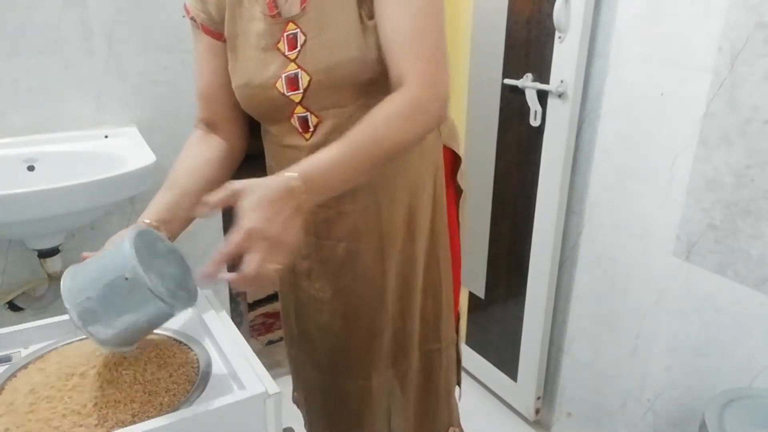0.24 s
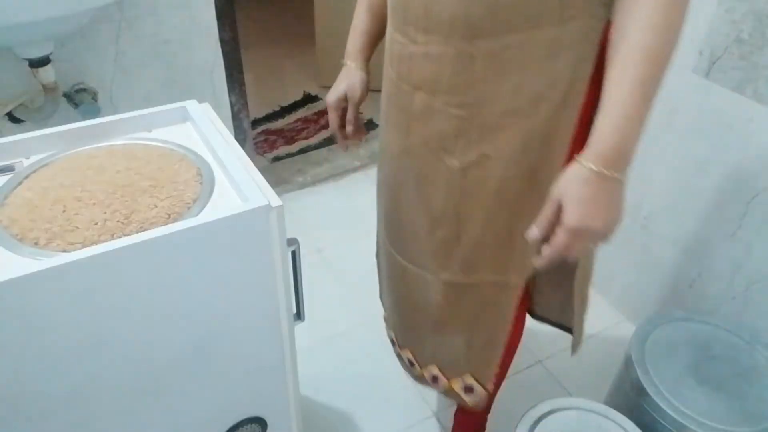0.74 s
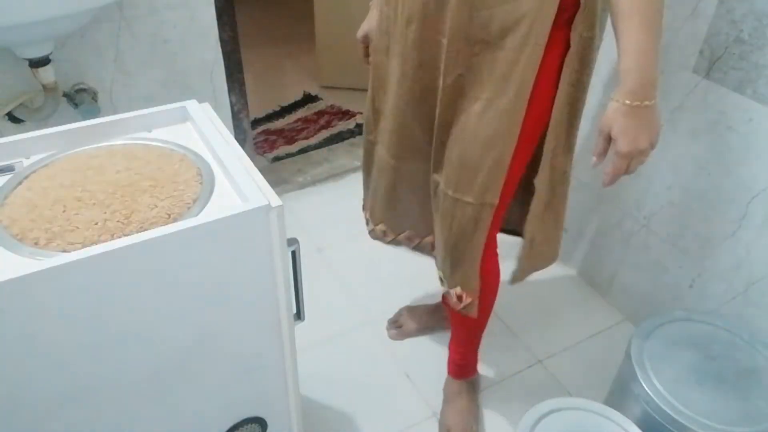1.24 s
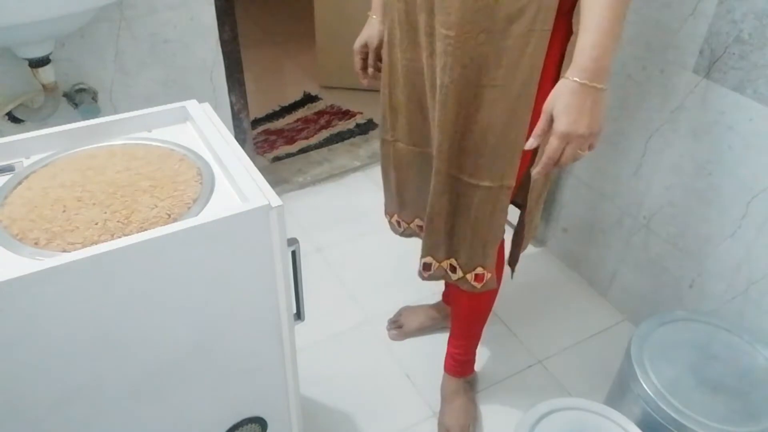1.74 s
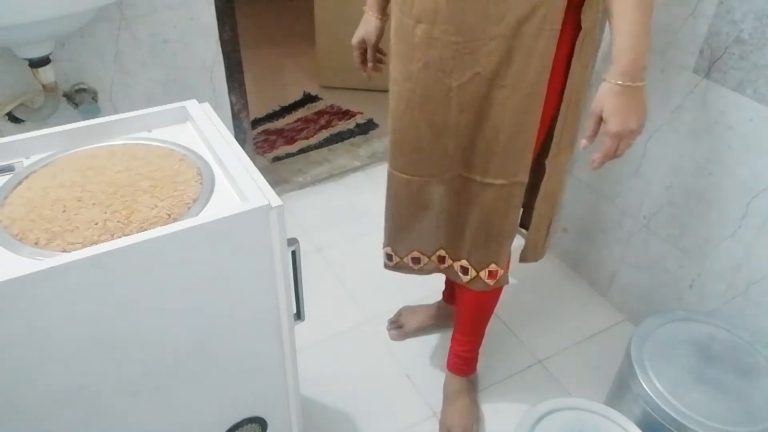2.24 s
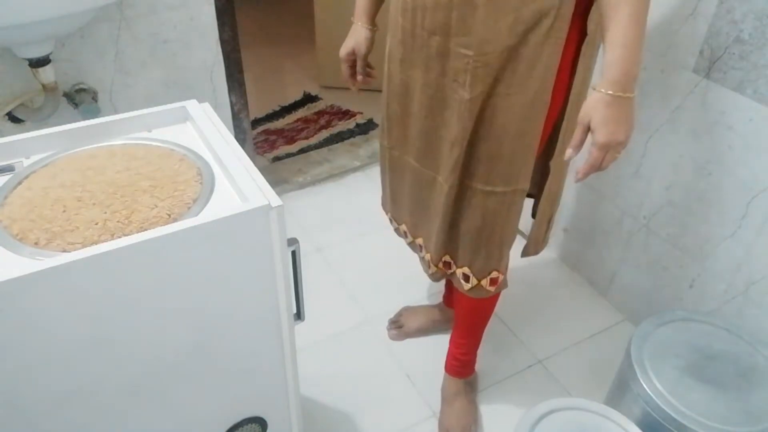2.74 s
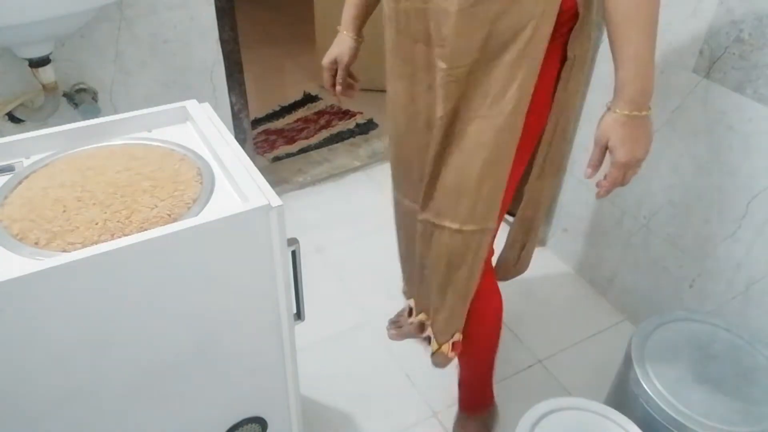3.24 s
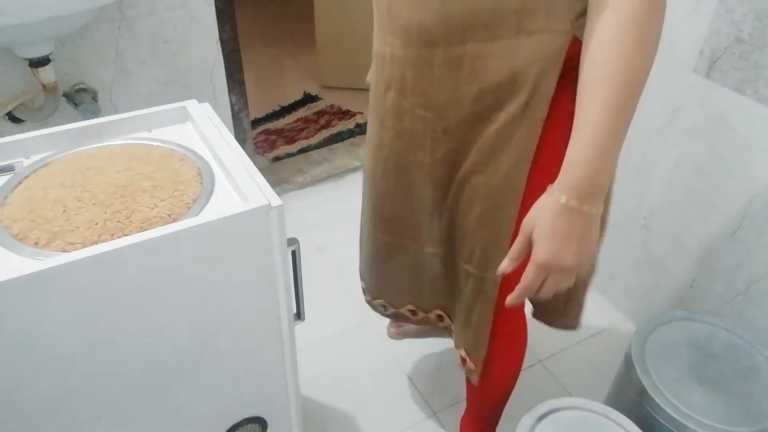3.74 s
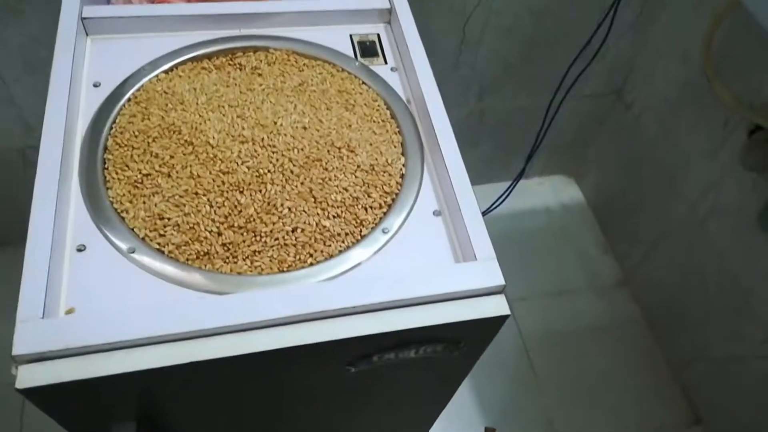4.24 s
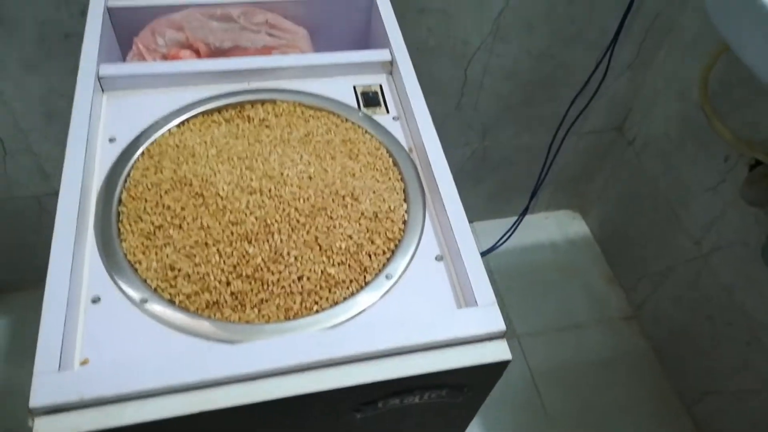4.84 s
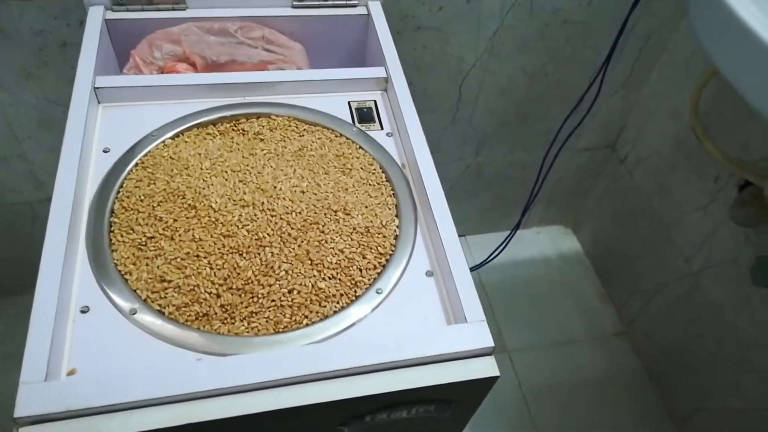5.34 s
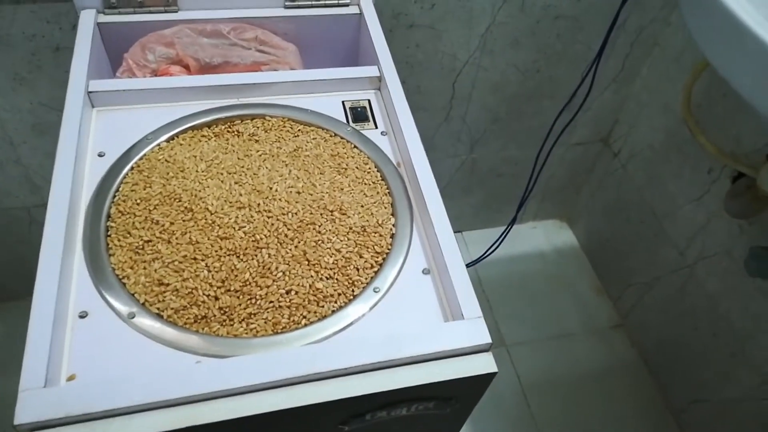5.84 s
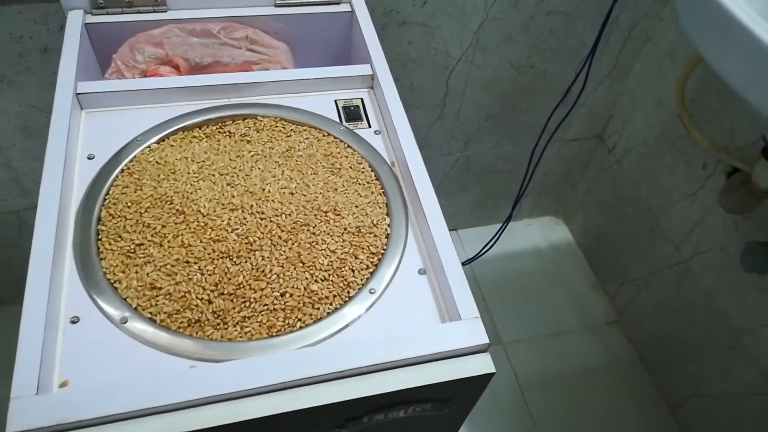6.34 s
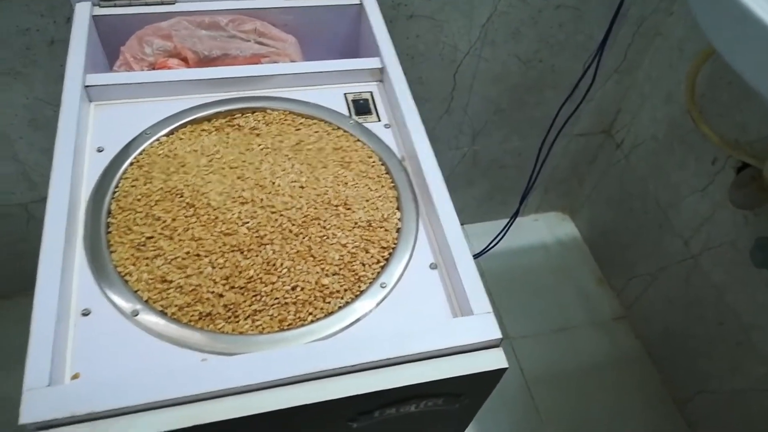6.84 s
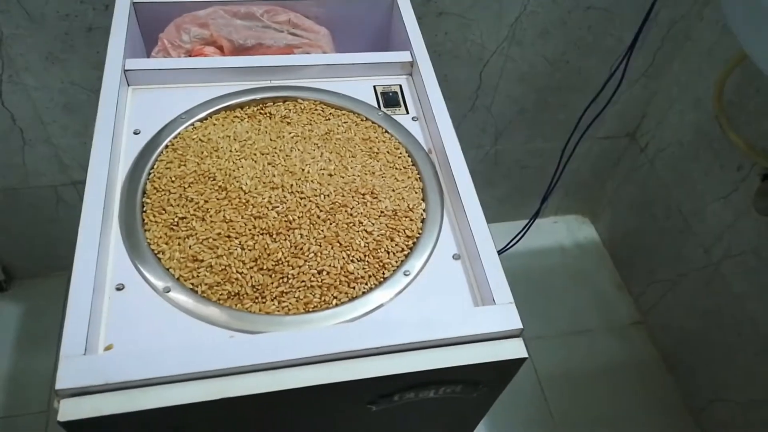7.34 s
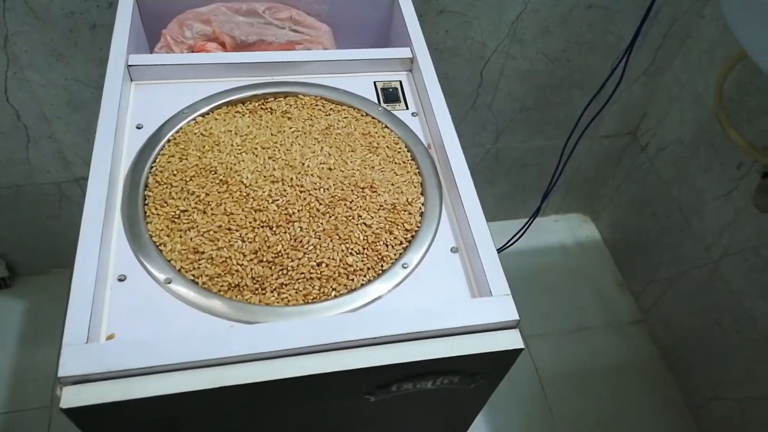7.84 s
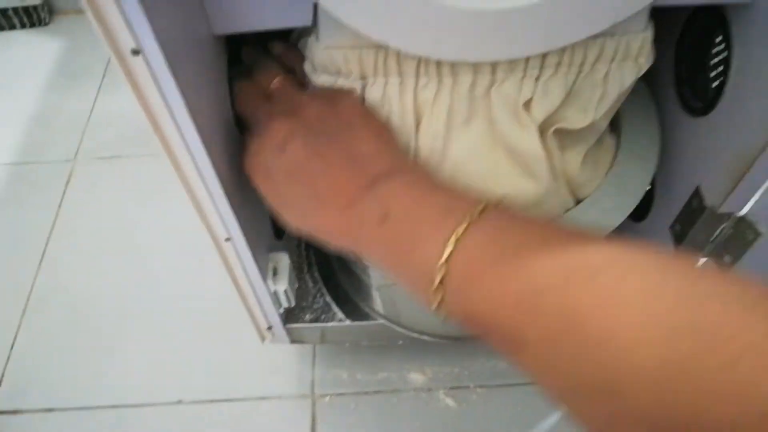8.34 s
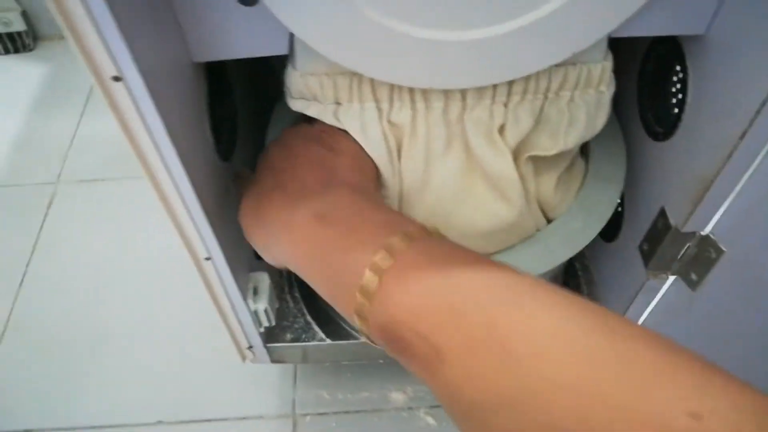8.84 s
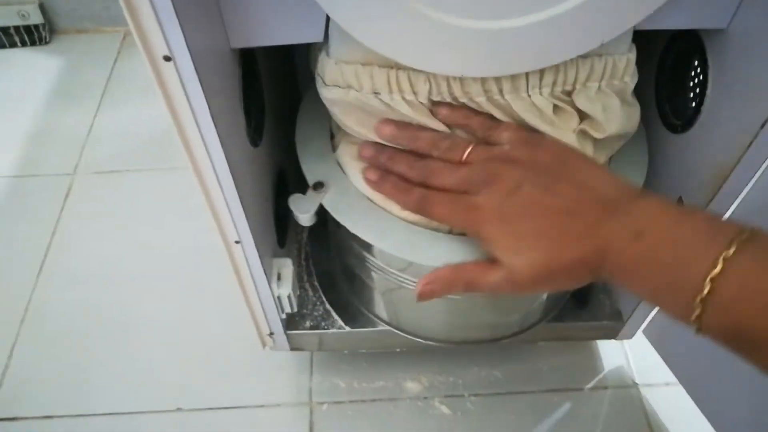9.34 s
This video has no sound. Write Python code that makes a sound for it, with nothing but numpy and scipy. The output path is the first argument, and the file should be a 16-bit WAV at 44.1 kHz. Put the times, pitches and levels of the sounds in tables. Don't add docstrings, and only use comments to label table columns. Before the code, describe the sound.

A short hiss of falling kernels, a steady droning grain mill with gritty crushing, an abrupt gap, then cloth rustle, metallic ticks and dull pot thuds.

```python
import sys
import numpy as np
from scipy import signal
from scipy.fft import rfft, irfft, next_fast_len
from scipy.io import wavfile

SR = 44100
rng = np.random.default_rng(int(sys.argv[2]) if len(sys.argv) > 2 else 0)


def store_pcm(level_fs):
    pcm = np.round(np.clip(level_fs, -1, 1) * 32767).astype(np.int16)
    wavfile.write(sys.argv[1], SR, np.atleast_2d(pcm).T)


def volts(x):
    e = np.asarray(x, float) / 20
    return 10 ** e


N = 422919

# (frequency [Hz], density [dB per Hz])
RUMBLE_SIDE = [(25, -79), (65, -78.5), (105, -62), (140, -63.5), (156, -68), (180, -63), (210, -61.5),
               (250, -67.5), (278, -61), (305, -55.5), (380, -75), (760, -70), (850, -66), (1500, -65),
               (2500, -73), (4000, -87)]
RUMBLE_TOP = [(25, -86.5), (65, -82), (100, -65.5), (190, -74.5), (250, -59.5), (310, -56.5), (385, -75),
              (760, -76), (850, -71.5), (1030, -72), (1200, -68), (1400, -69), (1600, -70), (2500, -88),
              (4000, -87.5)]
# (frequency [Hz], width [Hz], side boost [dB], top boost [dB])
CABINET = [(116, 8, 2, -9), (140, 5, 3, 4), (178, 8, 4, 0), (214, 6, 1, 6), (262, 9, -9, 2),
           (488, 22, 8, 2), (808, 10, 6, 0), (865, 25, 9, 7), (950, 20, 5, 12), (1071, 6, 11, 4),
           (1110, 30, 0, 7), (1180, 14, 0, 7), (1274, 10, 14, 8), (1305, 14, 8, 9), (1573, 12, 0, 7),
           (1594, 8, 11, 2), (1641, 12, 10, 0), (1669, 8, 10, 0), (1738, 8, 7, 0), (1754, 8, 10, 0),
           (2127, 20, 0, 6), (2304, 20, 5, 0), (2750, 20, 5, 0), (3511, 20, -9, 8), (3932, 20, -9, 3),
           (6800, 170, 0, 1)]
# (frequency [Hz], density [dB per Hz])
CRUSH_SIDE = [(1180, -24), (2000, -6), (2160, -16), (2620, -11.5), (2830, -10), (3030, -9), (4480, -5),
              (5440, -4), (6900, -0.5), (7910, -3.5), (10500, -18), (14400, -39), (15200, -30.5)]
CRUSH_TOP = [(1180, -19), (2000, -11), (2510, -13), (3440, -8), (3680, -10.5), (4080, -7.5), (5090, -10),
             (5980, 1), (6900, 1.5), (8320, -3), (9370, -4.5), (10900, -19), (13300, -18), (15200, -41)]
# (frequency [Hz], left-right [dB])
TILT_SIDE = [(60, 0.5), (130, 0), (290, 3.5), (640, 7), (1410, 5), (3100, 5.5), (6820, 10), (15000, 9.5)]
TILT_TOP = [(60, -1), (130, 2), (290, 0), (640, -4.5), (1410, -4.5), (3100, -9), (6820, -16), (15000, -53)]
# (time [s], rise [dB])
SURGES = [
    (1.9, 1.7),
    (4.1, 0.72),
    (4.8, 0.83),
    (6.83, 0.88),
    (5.9, -1.2),
    (7.8, 2),
]
# (time [s], half length [s], rise [dB])
SHAKES = [
    (.7, 0.4, 0.5),
    (3.952, 0.064, 2.5),
    (4.95, 0.31, 1.5),
]


def mill(t, shaft, tones, start, hum, rumble, column, crush, feed, tilt, lag):
    boosts = [(row[0], row[1], row[column]) for row in CABINET]

    def cabinet(hz):
        return np.sqrt(1 + peaks(boosts, hz))

    def rumble_colour(hz):
        return volts(at_hz(rumble, hz)) * cabinet(hz) * np.sqrt(SR / 2)

    def crush_colour(hz):
        return volts(at_hz(crush, hz)) * cabinet(hz) * (hz > 1500)

    body = ears(noise(len(t)), rumble_colour, tilt, lag)
    impacts = grains(len(t), per_s=24000, spread_db=1.44)
    crushing = ears(impacts, crush_colour, tilt, lag, patchy_db=0.54)
    surge_s = 0.12
    feed_db = feed + bumps(t, [(s, surge_s, rise_db) for s, rise_db in SURGES], power=2)
    shake_db = bumps(t, SHAKES, power=2.3)
    tonal = motor(t, shaft, tones, start, hum, wander_db=1.1)
    return tonal + volts(shake_db) * body + level(crushing, feed_db)


# (time [s], speed [turns/s])
SHAFT_SIDE = [(0.61, 48.685), (0.82, 48.56), (1.03, 48.526), (1.24, 48.47), (1.45, 48.486), (1.66, 48.468),
              (1.87, 48.424), (2.08, 48.493), (2.28, 48.441), (2.49, 48.449), (2.7, 48.482), (2.91, 48.5),
              (3.12, 48.525), (3.33, 48.515), (3.54, 48.505), (3.75, 48.5), (3.95, 48.448)]
SHAFT_TOP = [(4.15, 48.119), (4.38, 48.035), (4.6, 48.021), (4.83, 47.886), (5.05, 47.923), (5.28, 47.954),
             (5.5, 47.983), (5.73, 48.029), (5.95, 48.088), (6.18, 48.105), (6.4, 48.085), (6.63, 48.148),
             (6.85, 47.923), (7.08, 47.873), (7.3, 47.952), (7.53, 47.905), (7.75, 47.744)]
# (shaft order [-], mains multiple [-], level [dB], left-right [dB], left lead [rad])
TONES_SIDE = [(0, 2, -52.4, -0.3, 0.1), (0, 4, -39.1, 0.7, 0.5), (2, 0, -54.7, -0.2, 0.1),
              (6, 0, -22.1, 0.7, 1.3), (7, 0, -52.8, 3.6, 1.5), (12, 0, -52.6, -4.0, 2.7),
              (18, 0, -41.6, 4.3, -2.9), (18, 2, -34.7, 15.7, 2.8), (19, 0, -47.8, 7.0, -0.7),
              (20, 0, -38.8, 6.2, -3.0), (21, 0, -53.4, -2.0, -0.8), (22, 0, -53.6, 2.8, -0.7),
              (23, 0, -52.0, 4.4, 2.2), (24, 0, -41.0, 11.4, 1.1), (25, 0, -50.3, -4.8, 1.3),
              (26, 0, -53.4, 12.4, 1.7), (30, 0, -51.4, 4.7, -0.1)]
TONES_TOP = [(5, 0, -46.0, 1.1, -0.2), (6, 0, -26.1, -1.9, -0.8), (7, 0, -45.7, -6.8, -0.9),
             (12, 0, -48.4, -4.7, 2.8), (17, 0, -54.7, -7.6, 2.4), (18, 0, -42.4, -5.8, -2.3),
             (18, 2, -35.6, -4.6, 1.8), (20, 0, -39.0, -5.6, 1.6), (18, 4, -55, -4, 0),
             (23, 0, -54.1, 1.3, 0.0), (24, 0, -48.6, -8.0, 1.2), (26, 0, -54.5, -3.8, -2.7)]
MAINS_START = (.5, -.45)
# (time [s], half length [s], rise [dB])
SIEVE_BURSTS = [(1.55, .1, 8), (2.8, .12, 9), (4.95, 0.1, 7.5), (6.402, 0.032, -7), (6.529, 0.036, 0),
                (6.762, 0.094, 11.5), (6.96, .08, 12), (7.171, 0.092, 7), (7.398, 0.055, 7),
                (7.627, 0.046, 11), (7.795, 0.08, 13)]
# (time [s], half length [s], rise [dB])
SLOT_SWELLS = [
    (.6, 0.24, -2.5),
    (1.1, 0.18, 1),
    (2.7, 0.32, 2.5),
    (3.7, .25, 3.5),
    (4.5, 0.42, -1.5),
    (5.17, 0.18, 4.5),
    (6.1, .15, 1),
    (6.9, 0.48, 1.5),
]
# (time [s], half length [s], rise [dB])
SCREEN_SWELLS = [
    (.9, 0.28, 4),
    (2.03, .1, -2),
    (2.4, .3, -4),
    (3.2, 0.16, 3.5),
    (4.25, .2, -8),
    (5.0, .15, 1),
    (6.3, .5, -3.5),
    (7.1, .15, 7),
    (7.65, .25, 7.5),
]


def motor(t, shaft, tones, start, hum, wander_db):
    mains_hz = 50.07
    turn = 2 * np.pi * np.cumsum(in_time(shaft, t)[0]) / SR
    mains = 2 * np.pi * mains_hz * (t - t[0]) + start
    swell_db = hum * np.sin(np.pi * (t - t[0]) / (t[-1] - t[0]))
    load_swells = {(18, 2): SLOT_SWELLS, (20, 0): SLOT_SWELLS, (24, 0): SCREEN_SWELLS}
    out = np.zeros((2, len(t)))
    for order, multiple, db, tilt_db, lead in tones:
        jitter = 0.006 * order * drift(len(t), 2.5)
        angle = order * turn + multiple * mains + jitter
        wander = wander_db * drift(len(t), 2.2)
        if order == 6:
            wander = 0.27 * wander + swell_db - swell_db.mean()
        if order == 0:
            wander = 0.3 * wander
        if (order, multiple) == (18, 0):
            wander = wander - 3.0 + bumps(t, SIEVE_BURSTS, power=4)
        swells = load_swells.get((order, multiple))
        if swells:
            wander = 0.59 * wander + bumps(t, swells, power=2)
        size = np.sqrt(2) * volts(db + 0.015 * order + 0.5 + wander)
        left = volts(tilt_db / 2) * np.cos(angle)
        right = volts(-tilt_db / 2) * np.cos(angle - lead)
        out += size * np.array([left, right])
    return out


# (time [s], pitch [Hz], level [dB])
PANEL = [(4.1, 259, -36), (4.36, 262, -44), (4.47, 262, -37), (4.62, 264, -40.5), (4.75, 263, -28),
         (5.0, 260.3, -40), (5.4, 261, -32), (5.55, 258.7, -36), (5.68, 260, -28.5), (5.9, 261, -36),
         (6.3, 260.6, -40), (6.5, 260, -44), (6.62, 260.5, -30), (6.8, 261, -34), (6.95, 259, -46),
         (7.2, 260, -35), (7.45, 260, -40), (7.65, 261, -50), (7.82, 261.5, -28)]


def panel(t):
    hz, db = in_time(PANEL, t)
    angle = 2 * np.pi * np.cumsum(hz + 0.72 * drift(len(t), 3.5)) / SR
    size = np.sqrt(2) * volts(db + 5.0 + 0.9 * drift(len(t), 6.0))
    return size * np.array([volts(-9.0) * np.cos(angle), volts(-7.5) * np.cos(angle + 0.42)])


# (time [s], pitch [Hz], level [dB])
DOOR = [(.55, 139, -43), (1.0, 139.4, -50), (1.12, 142, -51), (1.28, 139, -37), (1.45, 141.3, -55),
        (1.6, 140.5, -46), (2.0, 140, -63), (2.6, 139, -72), (2.8, 138.7, -34), (3.05, 140, -49),
        (3.5, 141, -44), (3.73, 139.3, -53), (3.95, 139, -38), (4.06, 140, -46), (4.22, 140.4, -48.5),
        (4.36, 139.6, -61), (4.65, 138.8, -43), (5.08, 139, -57), (5.3, 139.3, -42.5), (5.4, 140.3, -55),
        (5.54, 142.4, -38), (5.68, 138.4, -57), (5.9, 139, -37.5), (6.05, 139.8, -51.5), (6.5, 138, -48),
        (6.9, 139, -55), (7.2, 139.3, -40.5), (7.36, 138, -58), (7.5, 139, -63), (7.75, 139, -47.5)]
# (time [s], half length [s], pitch [Hz], level [dB])
WALL_RINGS = [(.68, .2, 861, -38), (0.918, 0.2, 116, -39.5), (1.55, 0.057, 116, -44),
              (1.78, 0.097, 117.2, -43), (2.6, .1, 117.4, -40), (3.101, .07, 117, -38),
              (3.67, .06, 116, -40), (3.861, .07, 115, -37), (3.95, .1, 864, -39.5), (4.051, .004, 40, -39),
              (4.796, .12, 1290, -40), (5.147, 0.14, 1276, -40), (6.048, 0.091, 214, -40),
              (5.859, .06, 338, -41), (6.65, .1, 1280, -39), (7.4, 0.086, 1276, -39)]


def door(t):
    hz, db = in_time(DOOR, t)
    out = volts(db) * np.cos(2 * np.pi * np.cumsum(hz + 0.91 * drift(len(t), 3.0)) / SR)
    for s, half, ring_hz, ring_db in WALL_RINGS:
        near = slice(*np.searchsorted(t, [s - 2 * half, s + 2 * half]))
        since = t[near] - s
        swell = volts(ring_db) * np.exp(-((since / half) ** 2) ** 2)
        out[near] += swell * np.cos(2 * np.pi * ring_hz * since)
    return np.sqrt(2) * out


# (time [s], level [dB])
POUR = [
    (0.0, -33.5),
    (.1, -33.5),
    (0.21, -34.5),
    (.29, -41.5),
    (0.396, -48.5),
    (0.5, -61),
]
# (frequency [Hz], density [dB per Hz])
POUR_COLOUR = [(530, -26), (900, -24), (1120, -26), (1470, -20), (2420, -21), (2970, -19), (3310, -15),
               (3950, -7), (4560, -8.5), (5270, -12.5), (6530, -0.5), (8000, -7), (8800, -9), (14000, -22),
               (15600, -21)]
# (frequency [Hz], width [Hz], boost [dB])
HOPPER = [(1510, 200, -12), (2580, 120, -1), (2940, 110, 4), (4040, 120, 4.5), (4520, 170, 7.5),
          (5000, 100, 2), (5680, 120, 10.5), (6000, 150, 10), (6500, 370, 3.5), (7870, 300, 9.5),
          (9500, 200, 5)]
# (frequency [Hz], left-right [dB])
TILT_POUR = [(60, 0.0), (180, 4), (550, 4), (1650, 0), (4970, 3), (15000, 6.5)]


def pour(t):
    db, = in_time(POUR, t)
    stream = grains(len(t), per_s=9000 * volts(0.25 * (db - db.max())), spread_db=1.1)

    def colour(hz):
        return volts(at_hz(POUR_COLOUR, hz)) * np.sqrt(1 + peaks(HOPPER, hz))

    falling = ears(stream, colour, TILT_POUR, -15.5, patchy_db=1.3)
    return level(falling, db) + room(t, -59, bass_db=-2)


# (time [s], length [s], weight [dB], pot body [dB], change along press [dB])
PRESSES = [
    (7.944, 0.11, -58, -61.5, 4.5),
    (8.287, 0.055, -64, -70, 0),
    (8.41, 0.098, -72, -59, 4),
    (8.512, 0.1, -49, -49.5, -4.5),
    (8.62, 0.12, -57, -58, -3),
    (8.76, 0.061, -52, -42.5, -13.5),
    (8.973, 0.19, -65, -62, 1),
    (9.162, 0.077, -70, -50, -10),
    (9.27, 0.11, -51, -67, 4),
    (9.382, .18, -56, -49, -12),
]
# (time [s], length [s], cloth [dB], ring [dB], change along stroke [dB])
STROKES = [(7.936, 0.13, -52.5, -64.5, 5), (8.29, .1, -65, -67, 2), (8.378, 0.1, -55, -61, 2.5),
           (8.495, 0.059, -43, -45.5, -5.5), (8.55, 0.2, -56.5, -57.5, -0.5), (8.75, 0.21, -62, -68.5, 6),
           (8.979, 0.21, -52.5, -61.5, -2), (9.156, 0.02, -42.5, -60, -1.5),
           (9.176, 0.069, -46.5, -62, 0.5), (9.273, 0.15, -56.5, -66, -5), (9.367, .02, -56, -60, 0),
           (9.38, 0.185, -42.5, -51.5, -13.5)]
# (frequency [Hz], density [dB per Hz])
WEIGHT = [(12, -34), (20, 15), (55, -13), (75, 18), (97, -17), (120, -20), (160, -45), (260, -120)]
# (frequency [Hz], width [Hz], level [dB])
POT = [(167, 13, 0.5), (223, 40, -2), (285, 28, -3), (368, 140, -5.5)]
# (frequency [Hz], width [Hz], level [dB])
RING = [(970, 520, 0), (1500, 180, 3.5), (1700, 80, 2), (1900, 67, 5), (2350, 150, -4)]
# (frequency [Hz], density [dB per Hz])
CLOTH = [(1290, -25), (2200, -11.5), (3360, -4.5), (3900, -8), (4260, -4), (4820, -6), (7020, 1),
         (8200, -6.5), (8540, -8), (11000, -20.5), (15500, -25)]


def hand(t):
    lean = dict(attack_s=0.016, t60=0.64)
    slide = dict(attack_s=0.018, t60=0.22, follows=1)
    weight_db = gestures(t, PRESSES, column=2, follows=0.66, **lean)
    pot_db = gestures(t, PRESSES, column=3, follows=1, **lean)
    cloth_db = gestures(t, STROKES, column=2, **slide)
    ring_db = gestures(t, STROKES, column=3, **slide)
    size, lag = len(t), 26
    weight = ears(noise(size), lambda hz: volts(at_hz(WEIGHT, hz)), TILT_HAND, 0)
    pot = ears(grains(size, 900, 1.5), lambda hz: peaks(POT, hz), TILT_HAND, lag)
    scrape = ears(grains(size, 3000, 2.2), lambda hz: peaks(RING, hz) ** 0.55, TILT_HAND, lag)
    cloth = ears(grains(size, 14000, 1.6), lambda hz: volts(at_hz(CLOTH, hz)), TILT_HAND, lag, patchy_db=1.1)
    rubbing = level(weight, weight_db) + level(pot, pot_db + 0.5)
    rubbing = rubbing + level(scrape, ring_db - 0.5) + level(cloth, cloth_db - 0.6)
    return rubbing + knocks(t) + room(t, -64, bass_db=4.0)


def gestures(t, rows, column, attack_s, t60, follows):
    power = 1e-12
    for row in rows:
        since, length = t - row[0], row[1]
        change_db = follows * row[4] * np.clip(since / length, 0, 1)
        decay_db = 60 / t60 * np.maximum(since - length, 0)
        attack = np.clip(since / attack_s, 0, 1)
        power = power + (volts(row[column] + change_db - decay_db) * attack) ** 2
    return 10 * np.log10(power)


# (time [s], tick [dB], thud [dB], thud pitch [Hz])
KNOCKS = [(8.047, -60, -44, 290), (8.072, -46, -47, 280), (8.289, -54, -67, 200), (8.410, -62, -47, 190),
          (8.428, -66, -44, 188), (8.467, -62, -46, 180), (8.5, -60, -44, 270), (8.484, -42, -52, 200),
          (8.516, -46, -33, 208), (8.534, -55, -35, 178), (8.553, -62, -40, 170), (8.567, -50, -41, 167),
          (8.582, -60, -45, 275), (8.59, -66, -50, 170), (8.644, -66, -52, 200), (8.667, -48, -58, 200),
          (8.772, -60, -45, 190), (8.775, -70, -43, 294), (8.79, -62, -45, 285), (8.815, -64, -44, 190),
          (8.845, -66, -51, 200), (8.991, -26, -55, 300), (8.993, -34, -60, 300), (9.169, -28, -56, 250),
          (9.185, -60, -52, 190), (9.305, -70, -48, 75), (9.365, -70, -41, 75), (9.394, -34, -34, 232),
          (9.425, -48, -47, 282), (9.425, -70, -37, 80), (9.46, -60, -46, 278)]
# (time [s], level [dB], ring pitch [Hz])
RIM_TAPS = [(8.005, -50, 1560), (8.02, -53, 1560), (8.071, -31, 7000), (8.291, -50, 1500),
            (8.309, -55, 1500), (8.345, -54, 1550), (8.514, -39, 580), (8.522, -33, 572), (8.545, -44, 560),
            (8.565, -39, 600), (8.594, -40, 614), (8.622, -48, 610), (8.648, -49, 606), (8.664, -44, 607),
            (8.668, -44, 950), (8.668, -47, 1650), (8.484, -46, 1600), (8.497, -48, 1900),
            (8.519, -44, 1900), (8.992, -46, 1620), (8.993, -52, 452), (8.77, -51, 450)]
# (frequency [Hz], width [Hz], level [dB])
TICK = [(1210, 98, -9), (1700, 490, -6), (2700, 300, -5), (3400, 300, -11), (4480, 300, 5), (6900, 1500, 4)]


def knocks(t):
    def click_at(s):
        click = np.zeros(len(t))
        click[round((s - t[0]) * SR)] = 1
        return click

    tick, out = np.zeros((2, len(t)))
    for s, tick_db, thud_db, thud_hz in KNOCKS:
        click = click_at(s)
        tick += volts(tick_db) * click
        out += volts(thud_db) * ring(click, thud_hz, 21)
    for s, db, hz in RIM_TAPS:
        out += volts(db) * ring(click_at(s), hz, 0.045 * hz)
    for k, (hz, width, db) in enumerate(TICK):
        out += (-1) ** k * volts(db - 6.0) * ring(tick, hz, width)
    return np.array([volts(-1.5) * np.roll(out, 24), volts(1.5) * out])


def ring(clicks, hz, width):
    r, w = np.exp(-np.pi * width / SR), 2 * np.pi * hz / SR
    return signal.lfilter([0, np.sin(w)], [1, -2 * r * np.cos(w), r * r], clicks + 1e-18)


# (frequency [Hz], density [dB per Hz])
QUIET = [(15, -29), (25, -4.5), (150, -8), (354, -22), (600, -24), (1000, -21), (2130, -22), (3930, -20),
         (5280, -23), (6500, -18), (10600, -31), (15000, -29)]
# (frequency [Hz], left-right [dB])
TILT_HAND = [(60, 2), (180, -0.5), (550, -0.5), (1650, -0.5), (4970, -4.5), (15000, -6.5)]


def room(t, db, bass_db):
    def colour(hz):
        return volts(at_hz(QUIET, hz) + bass_db * (hz < 130))

    return level(ears(noise(len(t)), colour, TILT_HAND, 0), db)


# (frequency [Hz], share [0-1])
DIRECT = [(30, 0.9), (120, 1), (250, 1), (450, 0.56), (800, 0.51), (1500, 0.28), (4000, 0.083),
          (15000, 0.52)]


def ears(source, gain, tilt, lag, patchy_db=0):
    length = source.shape[1]
    size = next_fast_len(length)
    hz = np.arange(size // 2 + 1) * SR / size + 1e-3
    shared, left, right = rfft(source, size) * gain(hz)
    direct = np.clip(at_hz(DIRECT, hz), 0, 1)
    half = volts(at_hz(tilt, hz) / 2 * np.minimum(hz / 200, 1))
    delay = 2 * np.pi * hz * lag / SR
    left = half * (np.sqrt(direct) * shared * np.exp(-1j * delay) + np.sqrt(1 - direct) * left)
    right = (np.sqrt(direct) * shared + np.sqrt(1 - direct) * right) / half
    mid_power = (half ** 2 + half ** -2 + 2 * direct * np.cos(delay)) / 4
    pair = np.array([left, right]) * fine_ripple(hz) / np.sqrt(mid_power)
    if not patchy_db:
        return irfft(pair, size)[:, :length]
    out, together = 0, drift(size, 2.8)
    octave = np.clip(2.5 * np.log2(hz / 1800), 0, 8)
    for centre in range(9):
        band = np.clip(1 - abs(octave - centre), 0, 1)
        flicker_db = patchy_db * (together + 1.6 * drift(size, 9.2))
        out = out + irfft(pair * band, size) * volts(flicker_db)
    return out[:, :length]


def fine_ripple(hz):
    knots = np.arange(0, SR / 2 + 50, 25)
    ripples = [np.interp(hz, knots, rng.standard_normal(len(knots))) for ear in "LR"]
    return volts(1.7 * np.array(ripples) * (hz > 400))


def noise(size):
    return rng.standard_normal((3, size))


def grains(size, per_s, spread_db):
    born = rng.random((3, size)) < per_s / SR
    rise = np.minimum(rng.exponential(1, (3, size)), 4)
    return rms_one(born * volts(spread_db * rise) * rng.standard_normal((3, size)))


def drift(size, rate):
    r = np.exp(-80 * np.pi * rate / SR)
    draws = rng.standard_normal(size // 40 + 2002)
    slow = signal.lfilter([1], [1, -2 * r, r * r], draws)[2000:]
    return np.interp(np.arange(size) / 40, np.arange(len(slow)), rms_one(slow - slow.mean()))


def bumps(t, rows, power):
    coarse = t[::64]
    swells = [rise_db * np.exp(-abs((coarse - s) / half) ** power) for s, half, rise_db in rows]
    return np.interp(t, coarse, sum(swells))


def peaks(modes, hz):
    return sum(volts(2 * db) / (1 + (2 * (hz - f) / width) ** 2) for f, width, db in modes)


def level(pair, db):
    return volts(db) * pair / np.sqrt(np.mean(pair.mean(0) ** 2))


def rms_one(x):
    return x / np.sqrt(np.mean(x ** 2) + 1e-20)


def at_hz(points, hz):
    table = np.array(points)
    return np.interp(np.log(hz), np.log(table[:, 0] + 1e-3), table[:, 1])


def in_time(rows, t):
    s, *columns = np.transpose(rows)
    return [np.interp(t, s, c) for c in columns]


def samples(t0, t1):
    return np.arange(round(t0 * SR), round(t1 * SR)) / SR


# (side view [s], top view [s], silence [s], handling [s])
CUTS = (.5135, 4.0545, 7.8539, 7.9535)


def scene():
    side, top, silence, handling = CUTS
    pouring = pour(samples(0, side))
    t = samples(side, top)
    beside = door(t) + mill(t, SHAFT_SIDE, TONES_SIDE, MAINS_START[0], hum=3.2, rumble=RUMBLE_SIDE, column=2,
                            crush=CRUSH_SIDE, feed=-24.0, tilt=TILT_SIDE, lag=-26)
    t = samples(top, handling)
    above = mill(t, SHAFT_TOP, TONES_TOP, MAINS_START[1], hum=2, rumble=RUMBLE_TOP, column=3,
                 crush=CRUSH_TOP, feed=-19.5, tilt=TILT_TOP, lag=26)
    above = above + panel(t) + door(t)
    tail = volts(-34 - 700 * (t - silence)) * (t < silence + 0.014)
    above = np.where(t < silence, 1, tail) * above
    return np.hstack([pouring, beside, above, hand(samples(handling, N / SR))])


def low_pass(x):
    return signal.sosfilt(signal.butter(12, 15500, fs=SR, output="sos"), x)


def record(dry):
    limited = 0.94 * np.tanh(dry / 0.96)
    top_cut = signal.cheby2(22, 50, 15550, fs=SR, output="sos")
    return low_pass(signal.sosfilt(top_cut, limited))


dry = scene()
out = record(dry)
store_pcm(out)
```